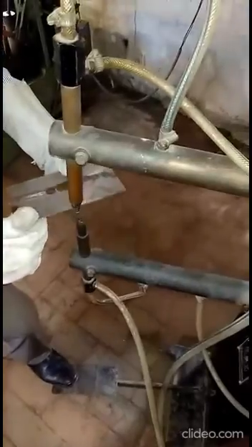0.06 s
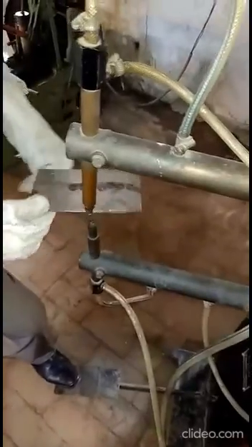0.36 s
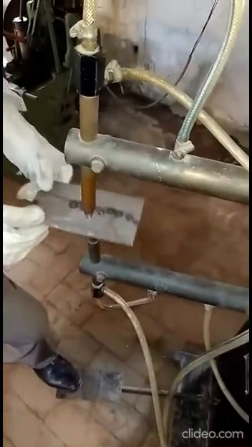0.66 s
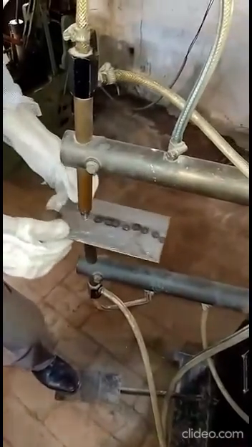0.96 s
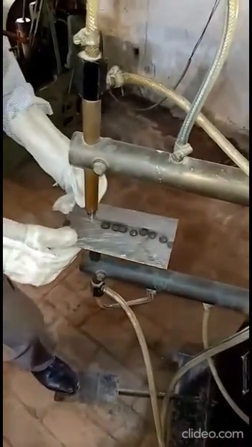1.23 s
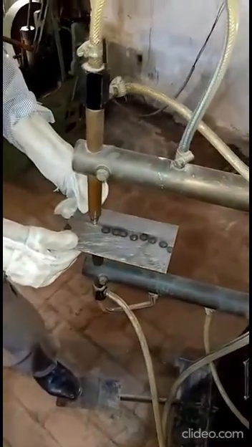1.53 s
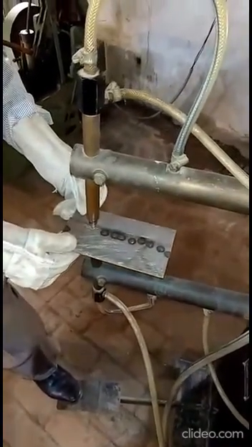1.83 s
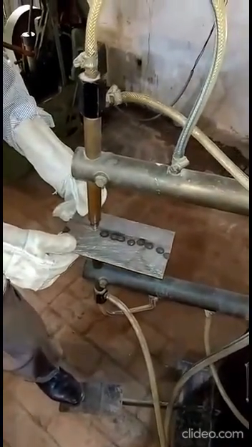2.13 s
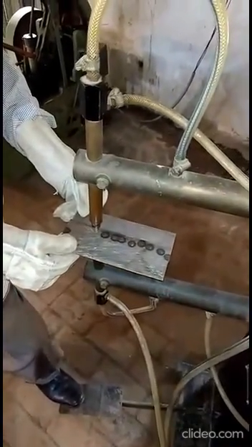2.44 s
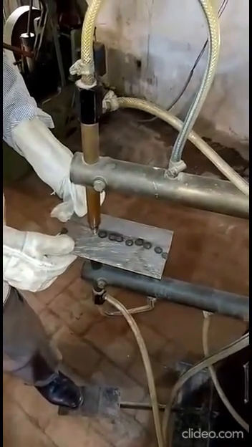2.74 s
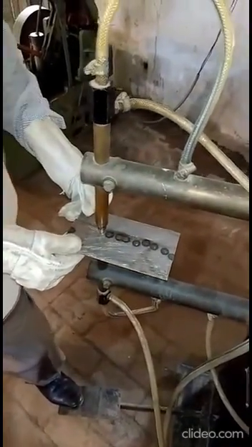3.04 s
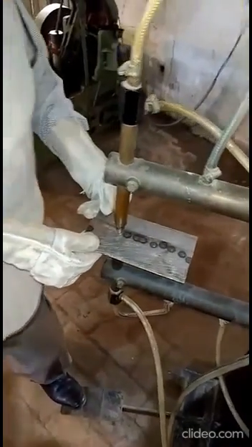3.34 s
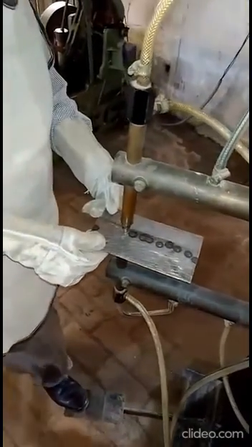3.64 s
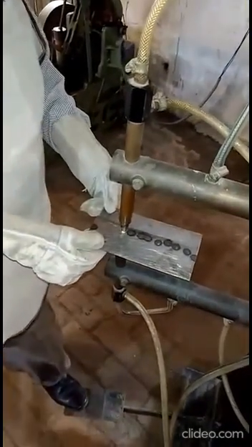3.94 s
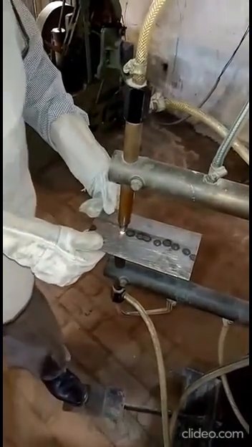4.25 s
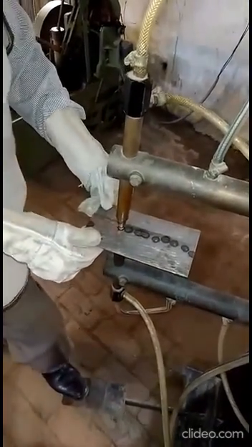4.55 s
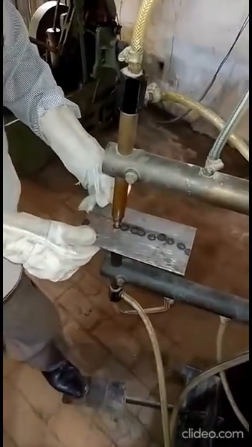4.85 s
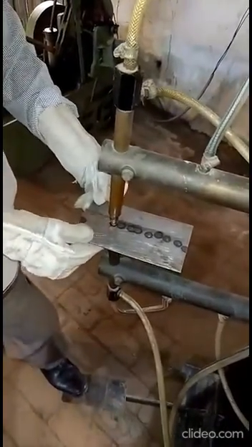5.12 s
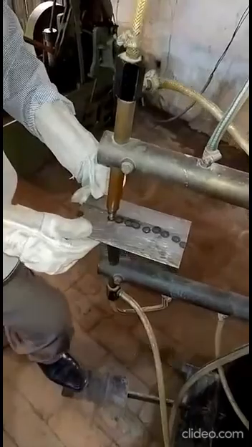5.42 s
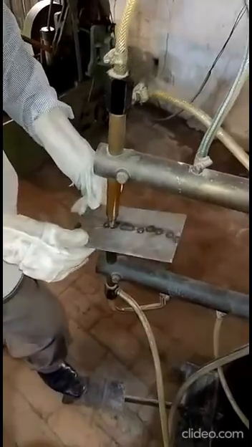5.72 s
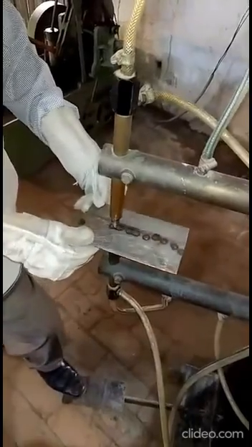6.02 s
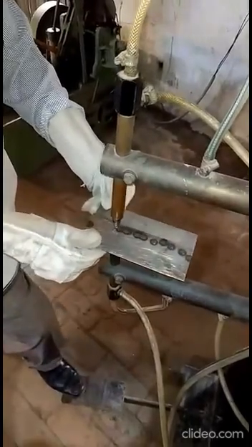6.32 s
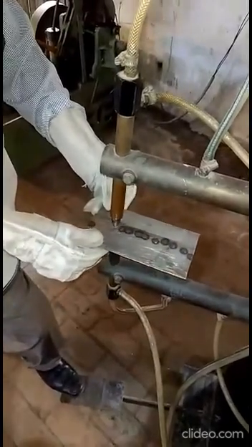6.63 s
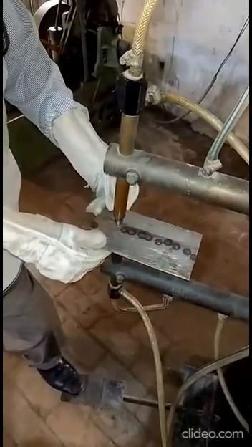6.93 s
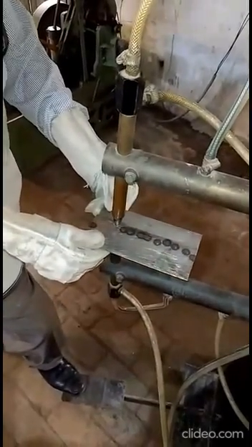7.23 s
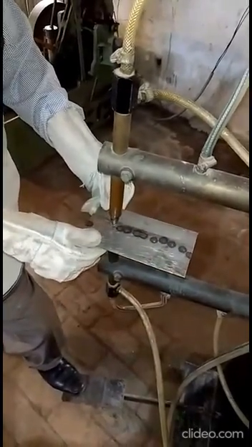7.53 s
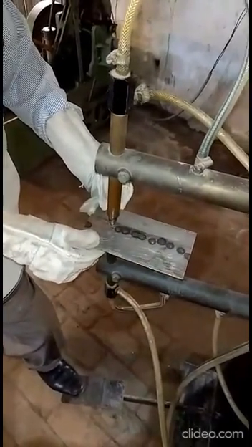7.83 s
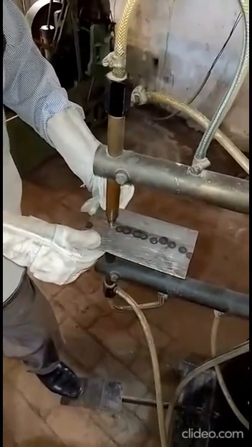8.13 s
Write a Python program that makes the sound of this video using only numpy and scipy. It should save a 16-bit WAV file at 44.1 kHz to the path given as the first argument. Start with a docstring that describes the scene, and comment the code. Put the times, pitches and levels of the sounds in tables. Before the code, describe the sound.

A few small metal clicks sound close by as a steel strip is placed in a spot welder. After a pause comes a crack and a short burst of electric buzzing and sizzling that fades with a metallic ring. A second later the arm opens with a loud clank, echoing in the workshop. The strip taps a few times and slides faintly. A low machine hum continues throughout.

```python
"""A pedal spot welder in a hard-walled workshop, over the drone of distant machines.
A steel strip is laid between the electrodes with a few clicks. The current strikes: the transformer
buzzes on multiples of twice the mains, the frame shakes, and the molten joint spits and hisses.
The current stops and the electrodes ring out. The arm springs open with a clank; the strip is set
down with a few taps and slides. A limiter ducks the loudest blow."""
import sys
import numpy as np
from scipy import signal
from scipy.fft import rfft, irfft, next_fast_len
from scipy.io import wavfile
from scipy.ndimage import uniform_filter1d, minimum_filter1d, map_coordinates

SR = 44100
rng = np.random.default_rng(int(sys.argv[2]) if len(sys.argv) > 2 else 0)


def waveform_to_disk(signal):
    """Save audio, clipped to [-1, 1], as 16-bit WAV at the path in sys.argv[1]."""
    frames = np.transpose(np.atleast_2d(signal))
    scaled = np.clip(frames, -1, 1) * 32767
    samples = np.round(scaled).astype(np.int16)
    wavfile.write(sys.argv[1], SR, samples)


N = 369116
SWITCH_ON_S, IGNITE_S, SWITCH_OFF_S = 3.492, 3.558, 4.377
BUZZ_HZ = 100.2  # twice the mains
LN_1000 = np.log(1000)  # 60 dB

# Noise spectra: freq_hz, density_db
DRONE_SPECTRUM = [(20, -34), (45, -30), (69, -26), (85, -13), (120, -5.5), (161, 1), (260, -6.5), (500, -6),
                  (755, -9.5), (1970, -22.5), (3260, -28), (4800, -29), (6200, -22), (14000, -33)]
WHIRR_SPECTRUM = [(500, -20), (1000, -0.5), (1700, -0.5), (3000, -13.5), (4500, -13), (6000, -41)]
WASH_SPECTRUM = [(1500, -45), (4500, -11), (6000, -4.5), (8200, 0), (10500, -6), (12500, -6.5), (14200, -8)]  # a contact's treble, back from the walls
RATTLE_SPECTRUM = [(30, -55), (120, -15.5), (250, -4), (400, -5), (600, -4), (780, -15), (1050, -8),
                   (1600, -25.5), (3000, -50)]
RUMBLE_SPECTRUM = [(20, -20), (55, -11), (68, -11), (80, 9.5), (99, -6), (123, 13), (160, 5), (220, 5),
                   (400, -48)]
SPRAY_SPECTRUM = [(300, -22.5), (700, -6), (1300, -9.5), (2100, -5), (3500, -6), (4700, -9.5), (6200, -6.5),
                  (8200, -3.5), (10500, -9), (12500, -11), (14200, -11)]

# Contacts: start_s, clank_db, thud_db, tick_db, chatter_t60_s, ring_db
STRIP_HITS = [ (0.138, -46, -54, -38, 0.049, -78), (0.146, -48, -51, -44, 0.09, -81),
              (0.260, -47, -31.5, -47.5, 0.32, -60), (0.480, -68, -40, -51.5, 0.25, -73),
              (0.646, -47, -48, -42.5, 0.079, -67), (1.239, -22.5, -36, -23.5, 0.028, -49.5),
              (2.778, -54, -46, -50, 0.068, -77)]
CRACK_HITS = [(3.564, -15.5, -24.5, -19, 0.043, -41), (3.570, -15, -23, -19, 0.035, -41),
              (3.578, -24, -35, -22, 0.03, -46)]  # the joint igniting
ARM_HITS = [ (5.590, -46.5, -47, -37.5, 0.065, -61), (5.662, -8.5, -15, -3, 0.018, -25),
            (8.157, -45.5, -49, -40.5, 0.045, -62)]
TIP_HITS = [(6.341, -31, -38, -43.5, 0.022, -46.5), (6.531, -29.5, -30.5, -36.5, 0.025, -46.5)]  # electrode tip on the firmly held strip

# Broad resonances: centre_hz, width_hz, gain_db
STRIP_BANDS = [(920, 410, 6), (1226, 100, 8), (1736, 290, 8), (2480, 260, 8.5), (2950, 300, 6.5),
               (3360, 300, -2.5), (4760, 200, -5), (5670, 200, -6)]
STRIP_TICK_BANDS = [(5700, 1300, -1.5), (6900, 740, 3), (8540, 1200, 2.5), (12700, 2900, -9.5)]
THUD_BANDS = [(338, 280, 1.5), (460, 110, 2.5), (747, 195, 3.5), (1170, 860, -6)]  # electrode arms and strip
PUSH_BANDS = [(60, 100, 0)]  # dull push under each contact
HISS_SWELL_BANDS = [(6000, 900, -2), (8500, 4000, -11)]
FRIZZLE_BANDS = [(2470, 1500, 3.5), (3800, 770, -5), (8000, 5400, -12)]
BURST_BANDS = [(1650, 260, -4), (2070, 530, 7), (3600, 400, -1), (8160, 2100, 2), (12500, 3500, -2)]
CRACK_BANDS = [(1680, 490, 6), (2050, 310, 5), (3700, 560, 0), (4600, 250, 5), (7350, 500, 5.5),
               (7980, 600, 2), (9400, 320, -9), (13100, 1500, -6)]
WELDER_TICK_BANDS = [(6100, 730, -1), (7370, 1500, 2.5), (8200, 700, 10.5), (9000, 1700, -4),
                     (12660, 1400, -9), (13440, 2000, -4.5)]
JUDDER_BANDS = [(794, 71, 0)]
ARM_BANDS = [(1120, 430, 1), (1365, 340, -7), (1685, 245, 5), (2093, 320, 7.5), (2325, 180, 2),
             (2860, 1140, 0.5), (3560, 190, -6), (4160, 210, 4), (4590, 180, 0)]
BOOM_BANDS = [(136, 70, 1), (215, 170, 1)]
TIP_BANDS = [(996, 220, 8), (1610, 330, 4.5), (2400, 350, 3), (2950, 210, 0.5), (3750, 310, -4),
             (4670, 260, -7.5)]

# Ringing modes: pitch_hz, level_db, t60_s
STRIP_MODES = [(359, 5, 0.94), (625, 6.5, 0.97), (893, 11.5, 0.46), (1002, 8.5, 0.67), (1233, 1, 0.39),
               (2580, 1, 0.6), (2545, -1, .9), (2660, -4, 0.9)]
CRACK_MODES = [(1910, 2, .35), (2080, -1, .4), (2100, -4, .35)]
ELECTRODE_MODES = [(497, 1, 0.9), (600, 9, 1), (1302, 0, 0.6), (1604, -2, .8), (1701, -7, 1.1),
                   (1803, -3, 1.1), (2170, -4, .9), (2277, -1.5, 1.23), (2416, 0.5, 1.3), (2490, 0, 1.3),
                   (2510, 3, 0.91), (2590, -6, 1.1), (2880, -9, 0.7), (3300, -10, .7)]
ARM_MODES = [(384, -14.5, 1.8), (520, -7.5, 1.3), (1103, -10, 1.7), (1118, -5, 1.43), (1143, -6, 1.4),
             (1705, -19, 1.3), (1730, -13, 1.2), (2034, -12, 1.6), (2120, -16, 1.4), (2184, -16, 1.5),
             (3040, -10, 0.6), (3130, -11, 0.48), (3600, -12, 0.77), (3898, -15, 1), (4030, -11, 0.7),
             (4110, -12, 0.9), (4340, -13, 0.85)]
TIP_MODES = [(650, -2, 0.44), (844, -1, 0.49), (1000, 2, 0.3)]

# Faint brief swells of hiss near 6 kHz: peak_s, level_db
HISS_SWELLS = [(1.10, -66), (2.70, -67), (3.17, -70), (5.38, -60), (6.45, -62), (7.34, -62), (7.87, -64),
               (8.34, -60)]
# Load changes on the frame: peak_s, rattle_db, rumble_db, rise_s, t60_s
FRAME_HEAVES = [(3.60, -32.5, -33, 0.32, 0.72), (3.77, -35, -38, 0.86, 0.94),
                (4.486, -23.5, -39, 0.2, 0.27), (4.57, -53, -37, 0.68, 0.2), (8.27, -71, -54, 0.43, 1.5)]
# Brief dip in the level of the weld's hiss: centre_s, depth_db
HISS_DIPS = [(3.758, 11), (3.82, -0.5)]
# Transformer partials on the cold and the soft joint: multiple, cold_db, soft_db, soften_delay_s
BUZZ_PARTIALS = [(2, -44, -51, 0.68), (2.98, -27, -31.5, 0.68), (4, -49, -41, 0.64), (5, -36, -44, 0.4),
                 (5.33, -49, -48, 0.25), (5.93, -37, -30.5, 0.69), (7, -41, -31, 0.63),
                 (7.33, -45, -58, 0.48), (7.67, -38.5, -60, 0.48), (8, -37, -38.5, 0.32),
                 (9, -49, -33, 0.53), (9.33, -42.5, -61, 0.56), (10, -53, -47, .65), (11, -57, -45, 0.53),
                 (12, -66, -43, 0.46), (13, -56, -33, 0.45), (14, -52, -60, 0.35), (15, -44.5, -53, .6),
                 (16, -53, -48, .6), (17, -49, -53, 0.65), (18, -60, -60, .6), (19, -45, -43, 0.41),
                 (22.4, -48, -58, .6)]
# Linkage pings: peak_s, rise_s, low_db, middle_db, high_db
LINKAGE_PINGS = [(5.592, 0.037, -60, -62, -35.5), (8.159, .008, -43.5, -39.5, -42)]
# Low, middle and high linkage modes: pitch_hz, t60_s
LINKAGE_MODES = [(1040, 0.14), (3200, 0.027), (8260, 0.034)]
# Strands of the strip's scrape: pitch_hz, sag_hz_per_s, level_db
SLIDE_STRANDS = [(3910, 2800, -59), (3650, 6300, -56)]

# Workshop reverberation: freq_hz, t60_s
ROOM_DECAY = [(70, 0.74), (200, 2.4), (500, 1.67), (1200, 1.4), (2500, 1.255), (5000, 1.09), (8000, 0.94),
              (13000, 0.58)]
# Likeness of the two microphone ports: freq_hz, coherence
PORT_COHERENCE = [(30, .3), (60, 0.13), (140, 0.81), (300, 0.31), (640, 0.53), (1400, 0.073),
                  (3100, -0.032), (4600, 0.21), (6200, 1), (8000, 0.93), (14000, 0.91)]
# Balance of the ports: freq_hz, left_minus_right_db
PORT_BALANCE = [(60, 12), (200, 15), (370, 13.5), (650, -4.5), (1290, 2.5), (2400, 1), (4400, -1),
                (8100, 1.5), (14000, 8.5)]


def amp(db):
    """Decibels to gain."""
    return 10 ** (np.asarray(db) / 20)


def unit(x):
    """Scale to rms 1."""
    return x / np.sqrt(np.mean(x ** 2) + 1e-20)


def along(points, hz):
    """Interpolate (freq_hz, value) points on a log axis."""
    freqs_hz, values = np.transpose(points)
    return np.interp(np.log(hz + 1), np.log(freqs_hz + 1), values)


def clock():
    """Sample times in seconds."""
    return np.arange(N) / SR


def gate(start_s, stop_s, rise_s, fall_s):
    """Gain 1 from start to stop; 60 dB ramps before and after."""
    t = clock()
    return np.exp(-LN_1000 * (np.maximum(start_s - t, 0) / rise_s + np.maximum(t - stop_s, 0) / fall_s))


def noise():
    """Two independent white noises."""
    return rng.standard_normal((2, N))


def wobble(knots_per_s):
    """Smooth random curve."""
    knots = rng.standard_normal(1024)
    coarse = np.arange(0, N, 64)
    curve = map_coordinates(knots, [coarse * knots_per_s / SR], mode="wrap")
    return np.interp(np.arange(N), coarse, curve)


def filtered(x, response):
    """Apply a complex frequency response."""
    size = next_fast_len(N + SR // 2)
    return irfft(rfft(x, size) * response(np.fft.rfftfreq(size, 1 / SR)), size)[..., :N]


def coloured(x, spectrum):
    """Shape by a spectrum, to rms 1."""
    return unit(filtered(x, lambda hz: amp(along(spectrum, hz))))


def resonate(x, bands):
    """Steep-sided body resonances; white noise keeps its power."""
    def response(hz):
        gain = sum(amp(db) * (1j * hz * width / (centre ** 2 - hz ** 2 + 1j * hz * width)) ** 2
                   for centre, width, db in bands)
        return gain / np.sqrt(np.mean(np.abs(gain) ** 2))
    return filtered(x, response)


def ringing(modes, t, flutter_rad):
    """Decaying modes in two channels, their phase unsteady from reflections."""
    out = np.zeros((2, len(t)))
    for hz, db, t60_s in modes:
        phase = 2 * np.pi * (hz * t + rng.random((2, 1))) + flutter_rad * wobble(28.1)[:len(t)]
        out += amp(db) * np.sin(phase) * np.exp(-LN_1000 * t / t60_s)
    return out


def echo(build_s):
    """Fresh two-channel room tail of energy 1; the treble dies faster."""
    hz, t, spectra = signal.stft(rng.standard_normal((2, 2 * SR)), SR, nperseg=256)
    decay = np.exp(-LN_1000 * t / along(ROOM_DECAY, hz)[:, None]) * (1 - np.exp(-t / build_s))
    tail = signal.istft(spectra * decay, SR, nperseg=256)[1][:, :2 * SR]
    return tail / np.linalg.norm(tail[0])


def in_room(x, wet_db):
    """Add the workshop's echo."""
    return x + amp(wet_db) * signal.fftconvolve(x, echo(build_s=0.0022), axes=1)[:, :N]


def at_ports(pair, focus):
    """Common and differing parts to left and right; focus scales the coherence."""
    common, differing = pair

    def side_gain(hz):
        coherence = np.clip(focus * along(PORT_COHERENCE, hz), -0.5, 1)
        return np.tan(np.arccos(coherence) / 2)
    side = filtered(differing, side_gain)
    return np.array([common + side, common - side])


def shop_drone(level_db, waver_db, drift_db, hiss_above_hz, hiss_waver_db):
    """Distant machines: a wavering low drone under a thin hiss that drifts by itself."""
    drone = coloured(noise(), DRONE_SPECTRUM)
    hiss = filtered(drone, lambda hz: 1 / (1 + (hiss_above_hz / (hz + 1)) ** 8))
    gain = amp(level_db + waver_db * wobble(11) + drift_db * wobble(1.705))
    return gain * (drone + (amp(hiss_waver_db * wobble(7)) - 1) * hiss)


def far_machine(level_db, left_lag_s):
    """Steady whirr from the right, reaching the left port later."""
    whirr = coloured(rng.standard_normal(N), WHIRR_SPECTRUM)
    lags_s = np.array([[left_lag_s], [0]])
    return amp(level_db) * filtered(whirr, lambda hz: np.exp(-2j * np.pi * hz * lags_s))


def contacts(hits, clank_bands, tick_bands, modes,
             modes_db, snap_db, chatter_db, echo_db, wash_db, push_db, flutter_rad):
    """Metal contacts: a snap, brief chatter through resonances, its echo; the struck part rings on."""
    t = np.arange(2 * SR) / SR
    blows = np.zeros((4, 2, N + len(t)))
    ring = np.zeros((2, N + len(t)))
    snaps = np.zeros((2, N))
    tone = ringing(modes, t, flutter_rad)
    for start_s, clank_db, thud_db, tick_db, t60_s, ring_db in hits:
        start = round(start_s * SR)
        span = slice(start, start + len(t))
        fade = np.exp(-LN_1000 * t / t60_s)
        force = np.linalg.norm(fade)
        chatter = amp(chatter_db) * fade * rng.standard_normal((2, len(t)))
        tail = force * echo(build_s=0.00088)
        blow = chatter + amp(echo_db) * tail
        blows[:, :, span] += [amp(clank_db) * blow, amp(thud_db) * blow,
                              amp(tick_db) * chatter, amp(tick_db + wash_db) * tail]
        snaps[0, start] = amp(clank_db) * force  # clean first touch
        ring[:, span] += amp(modes_db + ring_db) * tone
    clank, thud, tick, wash = blows[:, :, :N]
    bright = resonate(clank + amp(snap_db) * snaps, clank_bands) + resonate(tick, tick_bands)
    dull = resonate(thud, THUD_BANDS) + amp(push_db) * resonate(snaps, PUSH_BANDS)
    walls = filtered(wash, lambda hz: unit(amp(along(WASH_SPECTRUM, hz))))
    return ring[:, :N] + bright + dull + walls


def hiss_swells(width_s, rough_db):
    """Faint brief swells of hiss near 6 kHz."""
    swell = sum(amp(db) * np.exp(-((clock() - peak_s) / width_s) ** 2) for peak_s, db in HISS_SWELLS)
    return swell * amp(rough_db * wobble(40)) * resonate(noise(), HISS_SWELL_BANDS)


def frame_shake(rattle_db, rumble_db, throb_depth):
    """Magnetic forces shake arms and casing, which heave as the load changes."""
    shake = amp([[rattle_db], [rumble_db]]) * gate(SWITCH_ON_S, SWITCH_OFF_S, rise_s=0.03, fall_s=0.23)
    heaves = [amp(levels_db)[:, None] * gate(peak_s, peak_s, rise_s, t60_s)
              for peak_s, *levels_db, rise_s, t60_s in FRAME_HEAVES]
    rattle_gain, rumble_gain = np.sqrt(shake ** 2 + sum(heave ** 2 for heave in heaves))
    throb = 1 + throb_depth * np.cos(2 * np.pi * BUZZ_HZ * clock())
    rattle = rattle_gain * coloured(throb * noise(), RATTLE_SPECTRUM)
    return rattle + rumble_gain * coloured(noise(), RUMBLE_SPECTRUM)


def spurts(depth=0.12, sharpness=12):
    """Gain peaking at each crest of the current."""
    return 1 + depth * np.exp(sharpness * (np.cos(2 * np.pi * BUZZ_HZ * clock()) - 1))


def ignition(frizzle_db, burst_db, burst_s, hold_s, rough_db):
    """The cold joint frizzles, then bursts with a rough, ringing spit."""
    frizzle_gain = amp(frizzle_db) * gate(SWITCH_ON_S, IGNITE_S, rise_s=0.019, fall_s=0.019)
    burst_gain = amp(burst_db) * gate(burst_s, burst_s + hold_s, rise_s=0.029, fall_s=0.27)
    frizzle = frizzle_gain * resonate(noise(), FRIZZLE_BANDS)
    burst = burst_gain * resonate(noise(), BURST_BANDS)
    return (frizzle + burst) * spurts() * amp(rough_db * wobble(220))


def spray_envelope(level_db=-24.5, growth_db_per_s=4, dip_s=0.013):
    """The spray grows with the heat and dies as the joint cools; the level dips briefly."""
    t = clock()
    age_s = np.clip(t - IGNITE_S, 0, SWITCH_OFF_S - IGNITE_S)
    dip_db = sum(db * np.exp(-((t - centre_s) / dip_s) ** 2) for centre_s, db in HISS_DIPS)
    burn = amp(level_db + growth_db_per_s * age_s - dip_db)
    return burn * gate(IGNITE_S, SWITCH_OFF_S, rise_s=0.034, fall_s=0.52)


def metal_spray(spits_per_s, spit_db, flutter_db, patchy_db):
    """Molten metal sprays: a dense hiss of tiny spits, spurting each half cycle."""
    spits = unit(noise() * (rng.random(N) < spits_per_s * spurts() ** 3 / SR))
    spectra = signal.stft(noise() + amp(spit_db) * spits, nperseg=512)[2]
    patches = rng.standard_normal(spectra.shape[1:])  # the colour shifts from moment to moment
    for axis in (0, 1):
        patches = uniform_filter1d(patches, size=6, axis=axis)
    hiss = signal.istft(spectra * amp(patchy_db * unit(patches)), nperseg=512)[1][:, :N]
    return spray_envelope() * amp(flutter_db * wobble(45)) * spurts() * coloured(hiss, SPRAY_SPECTRUM)


def transformer(level_db, onset_db, settle_s, soften_s, waver_db, drift_rad, linger_db, linger_t60_s):
    """The buzz starts weak; its partials change level as the joint softens and linger in the room."""
    t = clock()
    age_s = np.maximum(t - IGNITE_S, 0)
    current = gate(IGNITE_S, SWITCH_OFF_S, rise_s=0.068, fall_s=0.28)
    current *= amp(level_db + onset_db * np.exp(-age_s / settle_s))
    pole = np.exp(-LN_1000 / (linger_t60_s * SR))
    buzz = np.zeros(N, complex)
    for multiple, cold_db, soft_db, delay_s in BUZZ_PARTIALS:
        hz = BUZZ_HZ * round(3 * multiple) / 3  # nearest third of a multiple
        softness = (1 + np.tanh((age_s - delay_s) / soften_s)) / 2
        drive = current * amp(cold_db + softness * (soft_db - cold_db))
        swell = drive + amp(linger_db) * signal.lfilter([1 - pole], [1, -pole], drive)
        phase = 2 * np.pi * hz * t + 1.35 * rng.standard_normal() + drift_rad * wobble(6.9)
        roughness = 0.14 * min(multiple / 6, 2)
        rasp = 1 + roughness * (wobble(70) + 1j * wobble(70))
        buzz += np.sqrt(2) * swell * rasp * amp(waver_db * wobble(9)) * np.exp(1j * phase)
    return np.array([buzz.real, buzz.imag])


def strip_judder(start_s, stop_s, edge_s, level_db, rough_db):
    """The clamped strip judders while the joint is still hard: a narrow rasp."""
    gain = amp(level_db + rough_db * wobble(60)) * gate(start_s, stop_s, edge_s, edge_s)
    return gain * resonate(noise(), JUDDER_BANDS)


def electrode_release(level_db, rise_s, flutter_rad):
    """The magnetic pull lets go; the electrodes ring out."""
    age_s = np.maximum(clock() - SWITCH_OFF_S, 0)[round(SWITCH_OFF_S * SR):]
    ring = amp(level_db) * (1 - np.exp(-age_s / rise_s)) * ringing(ELECTRODE_MODES, age_s, flutter_rad)
    return np.pad(ring, ((0, 0), (N - len(age_s), 0)))


def linkage_pings():
    """The arm's linkage takes up its play with short, bright pings."""
    out = np.zeros((2, N))
    for peak_s, rise_s, *levels_db in LINKAGE_PINGS:
        span = slice(round((peak_s - rise_s) * SR), round((peak_s + 0.2) * SR))
        t = clock()[span] - peak_s
        for (hz, t60_s), db in zip(LINKAGE_MODES, levels_db):
            fade = np.exp(-LN_1000 * np.maximum(-t / rise_s, t / t60_s))
            out[:, span] += amp(db) * fade * np.sin(2 * np.pi * (hz * t + rng.random((2, 1))))
    return out


def frame_boom(peak_s, level_db, rise_s, t60_s):
    """The heavy frame booms as the arm reaches its stop."""
    return amp(level_db) * gate(peak_s, peak_s, rise_s, t60_s) * resonate(noise(), BOOM_BANDS)


def strip_slide(start_s, edge_s, width_hz):
    """The strip scrapes on the electrode: two narrow strands, sinking as it slows."""
    age_s = np.maximum(clock() - start_s, 0)
    out = np.zeros((2, N))
    for hz, sag_hz_per_s, db in SLIDE_STRANDS:
        band = filtered(noise(), lambda f: 1 / (1 + (f / width_hz) ** 2))
        carrier = np.cos(2 * np.pi * np.cumsum(hz - sag_hz_per_s * age_s) / SR)
        out += amp(db) * unit(band * carrier)
    return out * gate(start_s, N / SR, edge_s, edge_s)


def scene():
    """Weld, metal contacts and shop at the two ports."""
    spray = metal_spray(spits_per_s=2600, spit_db=-4, flutter_db=1.55, patchy_db=3.8)
    shake = frame_shake(rattle_db=-41, rumble_db=-47, throb_depth=0.15)
    spit = ignition(frizzle_db=-51.5, burst_db=-24.5, burst_s=3.565, hold_s=0.038, rough_db=3)
    cracks = contacts(CRACK_HITS, CRACK_BANDS, WELDER_TICK_BANDS, CRACK_MODES, modes_db=0, snap_db=-2.5,
                      chatter_db=-0.5, echo_db=-6.5, wash_db=-10, push_db=-25, flutter_rad=1.3)
    buzz = transformer(level_db=-1, onset_db=-12.5, settle_s=0.2, soften_s=0.035, waver_db=1.2,
                       drift_rad=0.29, linger_db=-7.5, linger_t60_s=1.63)
    strip = contacts(STRIP_HITS, STRIP_BANDS, STRIP_TICK_BANDS, STRIP_MODES, modes_db=-2.5,
                     snap_db=-1.5, chatter_db=-3, echo_db=-8, wash_db=-4, push_db=-42, flutter_rad=1.4)
    tip = contacts(TIP_HITS, TIP_BANDS, STRIP_TICK_BANDS, TIP_MODES, modes_db=0, snap_db=-2,
                   chatter_db=-3.5, echo_db=-4, wash_db=-3.5, push_db=-39, flutter_rad=0.9)
    arm = contacts(ARM_HITS, ARM_BANDS, WELDER_TICK_BANDS, ARM_MODES, modes_db=-2, snap_db=0,
                   chatter_db=-2.5, echo_db=-2.5, wash_db=-2, push_db=-23, flutter_rad=0.84)
    slide = strip_slide(start_s=8.2, edge_s=0.057, width_hz=290)
    handling = strip + tip + in_room(slide + linkage_pings(), wet_db=-11)
    shop = shop_drone(level_db=-49, waver_db=1, drift_db=0.48, hiss_above_hz=5200, hiss_waver_db=1)
    swells = hiss_swells(width_s=0.08, rough_db=3)
    whirr = far_machine(level_db=-57.5, left_lag_s=0.00039)
    judder = strip_judder(start_s=3.75, stop_s=4.13, edge_s=0.67, level_db=-37.5, rough_db=2.5)
    release = electrode_release(level_db=-33.5, rise_s=0.013, flutter_rad=0.92)
    boom = frame_boom(peak_s=5.69, level_db=-44, rise_s=0.077, t60_s=1.45)
    weld = amp(-2.5) * in_room(spray + shake, wet_db=-3) + in_room(spit, wet_db=-7.5)
    weld += cracks + buzz + judder + release
    return (at_ports(weld, focus=0.99) + at_ports(handling, focus=0.91)
            + at_ports(arm + boom + shop + swells, focus=1) + whirr)


def balance_and_notch(x, notch_hz, notch_width_hz, notch_db):
    """Bass leans left; a narrow dip near 5 kHz is cut from the whole sound."""
    def response(hz):
        ratio = amp(along(PORT_BALANCE, hz))
        notch = amp(notch_db * np.exp(-((hz - notch_hz) / notch_width_hz) ** 2))
        right = 2 * notch / (1 + ratio)
        return np.array([ratio * right, right])
    return filtered(x, response)


def limiter(x, ceiling_db, release_db_per_s):
    """Peaks cut the gain at once; it recovers at a steady rate."""
    over_db = np.maximum(20 * np.log10(np.abs(x).max(axis=0) + 1e-9) - ceiling_db, 0)
    ramp_db = release_db_per_s * clock()
    cut_db = np.maximum.accumulate(over_db + ramp_db) - ramp_db
    return x * uniform_filter1d(minimum_filter1d(amp(-cut_db), size=32), size=32)


def record(dry):
    """Left-right balance, treble notch, limiter, band limit."""
    heard = balance_and_notch(dry, notch_hz=5060, notch_width_hz=140, notch_db=-14)
    limited = limiter(heard, ceiling_db=-3.5, release_db_per_s=107)
    return filtered(limited, lambda hz: hz < 14350)


dry = scene()
out = record(dry)
waveform_to_disk(out)
```